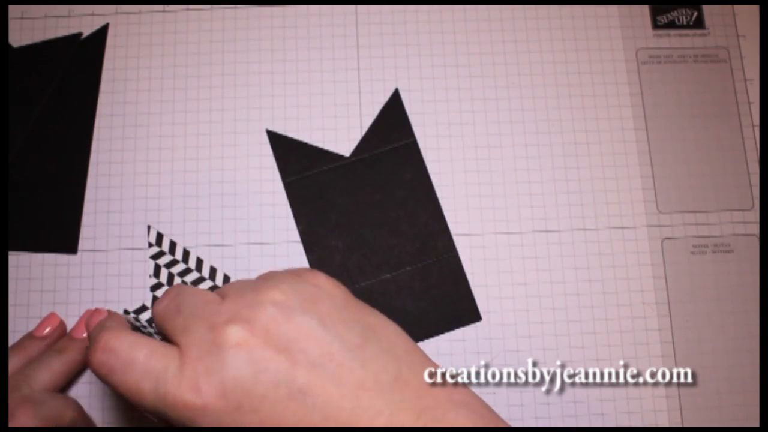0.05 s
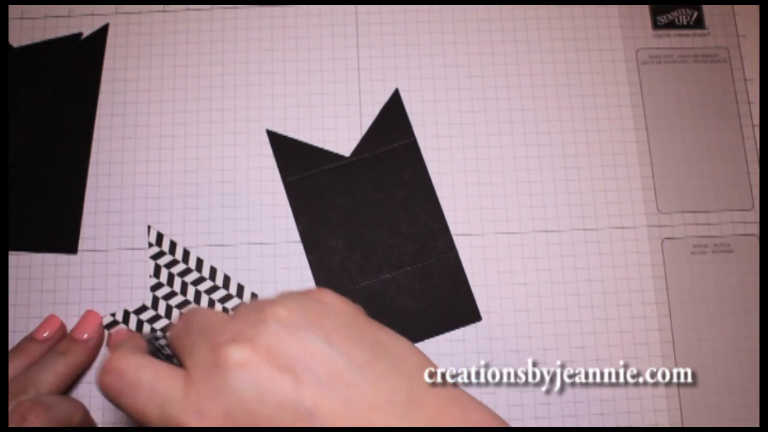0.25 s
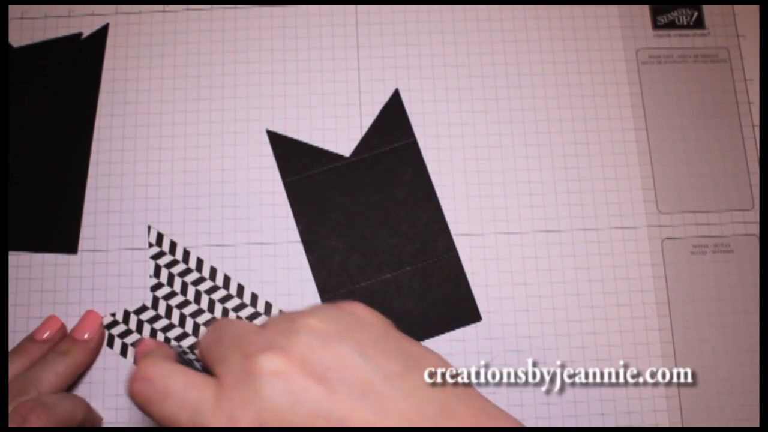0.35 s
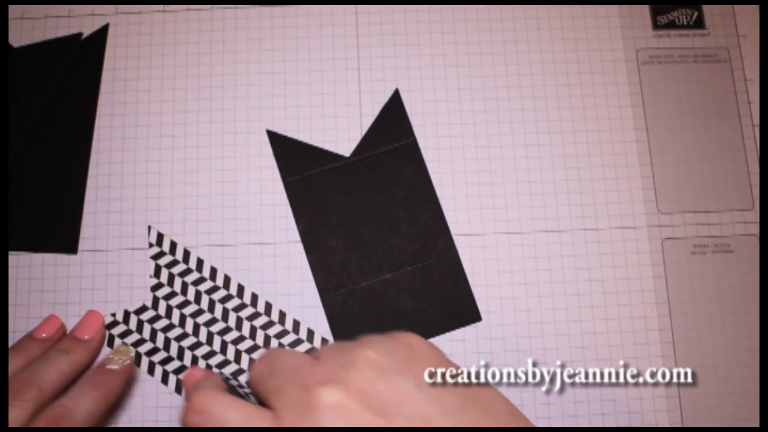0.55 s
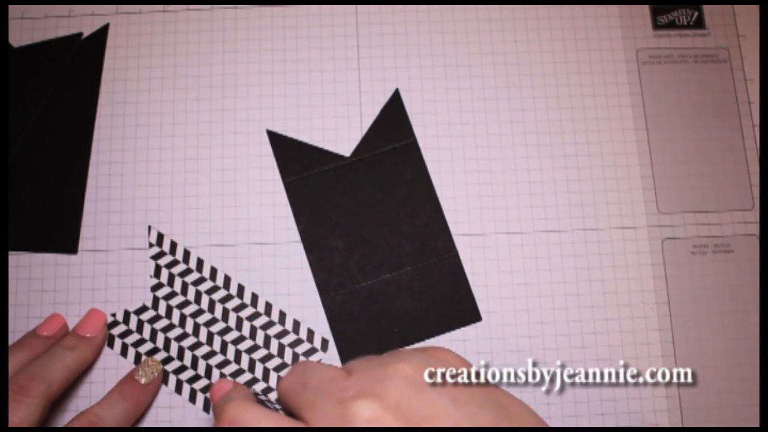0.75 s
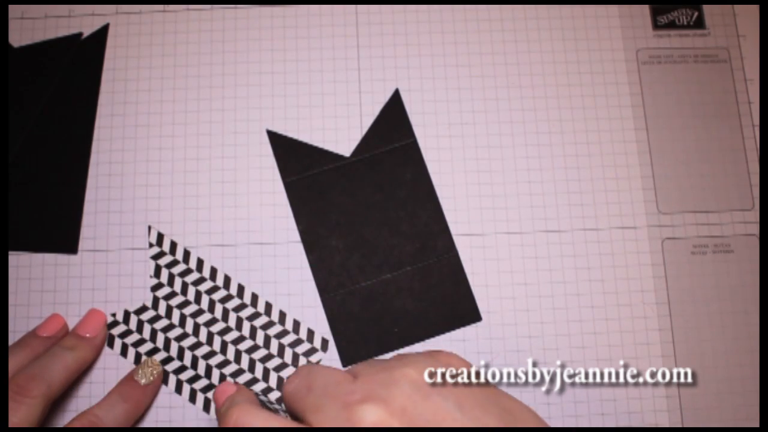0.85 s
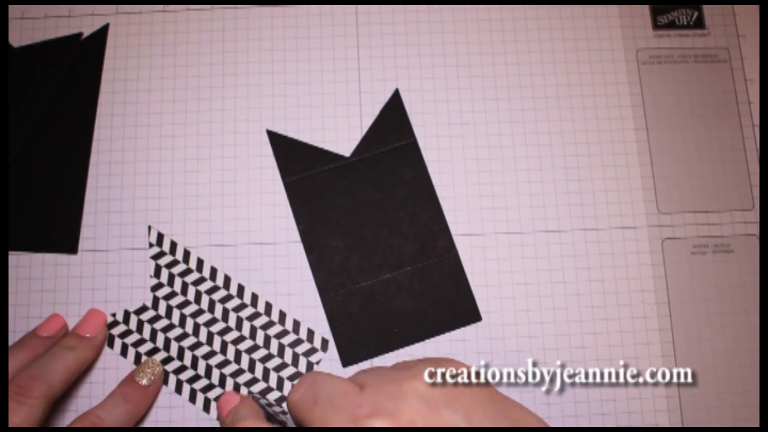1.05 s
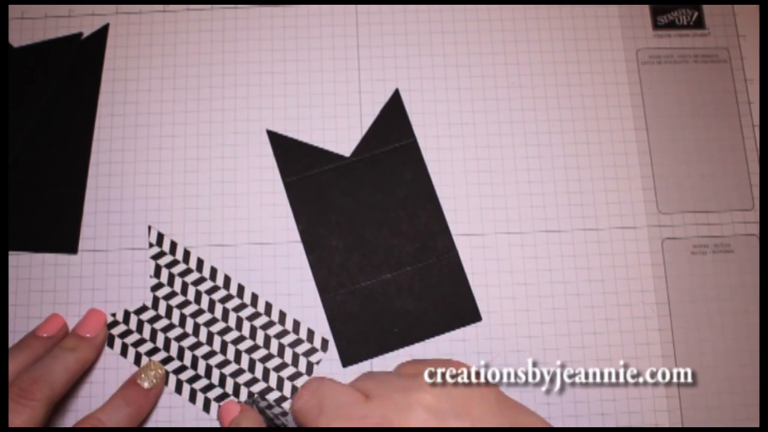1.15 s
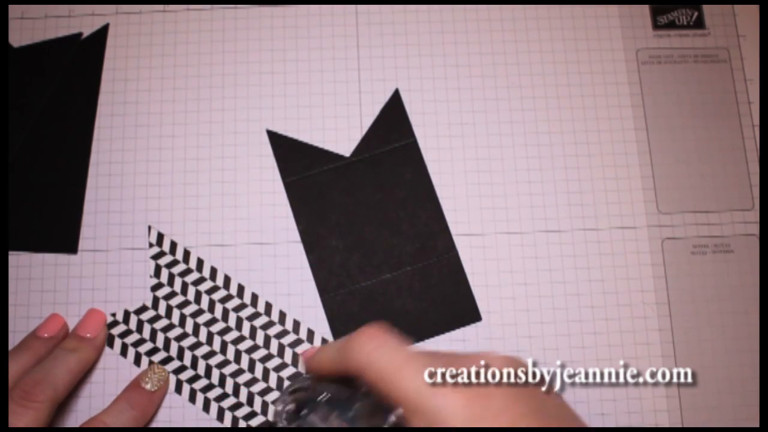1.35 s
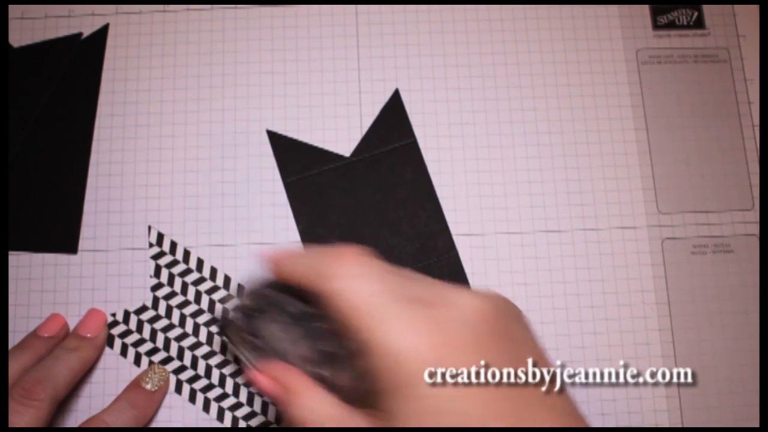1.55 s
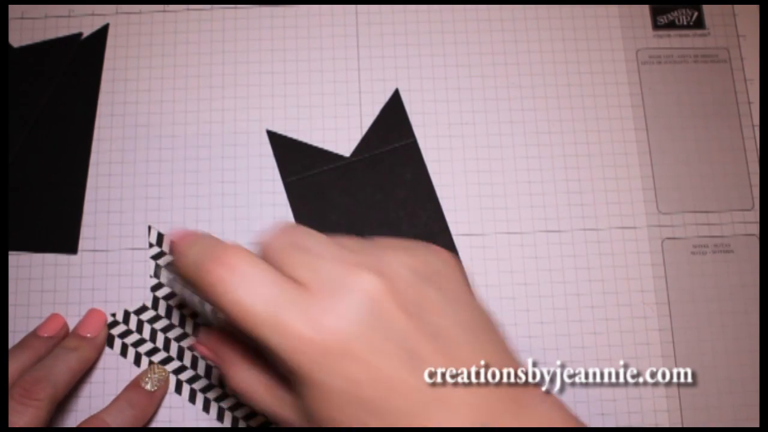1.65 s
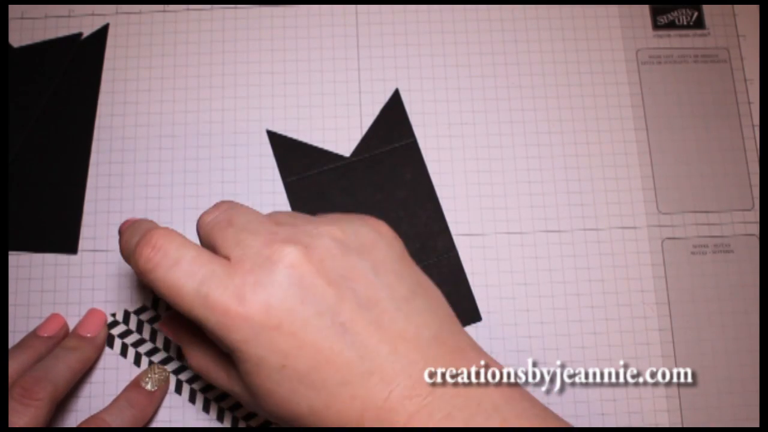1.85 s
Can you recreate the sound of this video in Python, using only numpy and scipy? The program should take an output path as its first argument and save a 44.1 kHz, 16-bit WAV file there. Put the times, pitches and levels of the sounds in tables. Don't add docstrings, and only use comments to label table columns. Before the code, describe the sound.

Tape runner dragged over paper: one bright, buzzing ratchet stroke, then scattered plastic snaps in a quiet room

```python
import sys
import numpy as np
from scipy import signal
from scipy.fft import rfft, irfft
from scipy.io import wavfile
from scipy.ndimage import uniform_filter1d

SR = 44100
rng = np.random.default_rng(int(sys.argv[2]) if len(sys.argv) > 2 else 0)


def transcribe(u):
    v = np.clip(np.atleast_2d(u).T, -1, 1)
    q = np.round(v * 32767).astype(np.int16)
    wavfile.write(sys.argv[1], SR, q)


def boost_factor(decibels):
    exponent = np.asarray(decibels, float) / 20
    return 10 ** exponent


N = 83790

# [f/Hz, density/dB]
ROOM_TONE = [(18, -41), (30, -40.5), (109, 1), (149, -12), (584, -14), (844, -18), (1250, -17),
             (1390, -20.5), (16000, -34.5)]
# [f/Hz, width/Hz, level/dB]
FINGERS = [
    (50, 67, -14),
    (310, 430, 3),
    (3000, 6300, -8.5),
]
# [f/Hz, width/Hz, level/dB]
HUM_BANDS = [(91.8, 2.7, -77), (119.8, 6.7, -60.5), (241.5, 31, -80), (48.6, 28, -78)]
# [t/s, glue dots passed]
TAPE_TRAVEL = [(.239, 0), (.30, 22), (.36, 42), (.40, 57), (.44, 70), (.462, 75), (.50, 89), (.56, 110),
               (.575, 115), (.602, 121), (.627, 126), (.661, 131), (.670, 132), (.697, 136), (.720, 140),
               (.746, 145), (.766, 149), (.786, 152)]
# [t/s, level/dB]
ROLLER_PRESSURE = [(.24, -21.5), (.29, -31.5), (.33, -28), (.37, -26), (.405, -21.5), (.435, -30.5),
                   (.46, -31), (.47, -35), (.53, -19.5), (.56, -27.5), (.60, -25.5), (.64, -38), (.70, -30),
                   (.745, -32), (.79, -20.5)]
LONE_DOT_TIMES = [.0283, .130, .138, .152, .918, .930, .9394, .9494, .9584, .9879, 1.0907, 1.1085, 1.1423,
                  1.249, 1.272, 1.2809, 1.3031]
# [level/dB, body/dB]
LONE_DOT_LEVELS = [(-26, -5), (-34, -5), (-33, -25), (-21.5, -11.5), (-8.5, -17), (-13, -17), (-17, -17),
                   (-18, -21), (-19.5, -13), (-17, -11), (-20, -14), (-19, -12), (-14, -10), (-38, -24.5),
                   (-18, -13.5), (-11.5, -10.5), (-10, -9.5)]
# [f/Hz, width/Hz, level/dB]
TAPE_BANDS = [(10720, 3000, -4.5), (12220, 2300, 6.5), (13420, 2280, 9.5), (14770, 1500, 5)]
# [f/Hz, width/Hz, level/dB]
CRACK_BANDS = [(5200, 4300, -10.5), (7850, 10500, 8.5)]
# [t/s, level/dB, treble/dB, shell ring/dB, loudest part f/Hz]
GEAR_KNOCKS = [(.0292, -30.5, -19, -44, 3680), (.067, -25, -28, -10, 3000), (.094, -35, -35, -3, 1200),
               (.1158, -22, -23, -10, 2430), (.136, -20.5, -32, 3.5, 1680), (.1475, -26, -24, 6.5, 1770),
               (.174, -19.5, -34, -2.5, 1820), (.8975, -36, -16, 0.5, 2520), (.923, -9, -9.5, -27, 3070),
               (.9895, -12, -9.5, -16, 5100), (1.0925, -29.5, -4, -4, 1370),
               (1.1105, -20.5, -7.5, 0.5, 5200), (1.1455, -15, -20, -7, 2600),
               (1.304, -12, -4.5, -37, 2740)]
# [t/s, level/dB, treble/dB, shell ring/dB]
RATCHET_TEETH = [(0.2301, -8, -5.5, -4), (0.2497, -8, -17, -11), (0.2658, -11.5, -3, 6.5),
                 (0.283, -11, -5, -2), (0.2985, -10.5, -5, -12), (0.3153, -12.5, -4.5, 2),
                 (0.334, -13, -2, -6), (0.3531, -15.5, -30, 11), (0.3741, -16, -1, -2), (0.392, -18, -6, 3),
                 (0.4076, -19.5, 4.5, -9), (0.4252, -21, 5, -19), (0.446, -18, -2, -12),
                 (0.4698, -18, -6, -31), (0.4908, -17.5, -3, 7.5), (0.511, -12.5, -21, -31),
                 (0.529, -19, -47, 11), (0.5478, -11, -3, -12), (0.5687, -13.5, -1.5, -32),
                 (0.5948, -11.5, -9, -43), (0.628, -13.5, -3.5, 4), (0.6755, -12, -7, -6),
                 (0.7217, -8.5, -10.5, -5.5), (0.75, -11, -6.5, -53), (0.7829, -11, -29, -49)]
# [f/Hz, level/dB]
SHELL_MODES = [(1180, -9), (1380, -16.5), (2050, -2.5), (2400, -4.5), (2980, 3.5), (3550, 5.5), (4240, 3),
               (4700, 2.5), (5210, 4.5), (6200, -5), (7300, -17), (8300, -56)]
# [f/Hz, level/dB]
RING_MODES = [(1670, -4), (1770, 0)]
# [f/Hz, width/Hz, t60/s, level/dB]
ROOM_TAIL = [(1346, 1700, 0.3, -11.5), (2600, 1380, 0.28, -12), (4910, 3220, 0.39, -14.5),
             (8270, 2400, .25, -12.5), (12000, 5800, 0.3, -20)]
# [f/Hz, level/dB]
THUD_MODES = [(1140, -3.5), (1370, 2.5)]
SHELL_T60_S = .008


def band(x, hz, width):
    edges = [max(hz - width / 2, 10), min(hz + width / 2, SR / 2.2)]
    return signal.sosfilt(signal.butter(2, edges, "band", fs=SR, output="sos"), x)


def bands(x, rows):
    return sum(boost_factor(db) * band(x, hz, width) for hz, width, db in rows)


def unit(x):
    return x / np.sqrt(np.mean(x ** 2))


def ring(x, modes, t60, colour_db=0):
    out = 0
    for (hz, db), extra_db in zip(modes, np.zeros(len(modes)) + colour_db):
        pole = np.exp(2j * np.pi * hz / SR - np.log(1000) / (t60 * SR))
        out = out + boost_factor(db + extra_db) * signal.lfilter([1], [1, -pole], x).imag
    return out


def clicks(times, db):
    return np.bincount((np.asarray(times) * SR).astype(int), boost_factor(db), N)[:N]


def background():
    f = np.arange(N // 2 + 1) * SR / N + 1
    hz, db = np.array(ROOM_TONE).T
    spectrum = boost_factor(np.interp(np.log(f), np.log(hz), db))
    tone = irfft(rfft(rng.standard_normal(N)) * spectrum, N)
    tone = tone * boost_factor(-59) / np.std(band(tone, 8120, 15870))
    settling = boost_factor(-51.5 - 60 * np.arange(N) / SR / 4.2)
    fingers = settling * unit(bands(rng.standard_normal(N), FINGERS))
    hum = sum(boost_factor(db) * unit(band(rng.standard_normal(N), hz, width)) for hz, width, db in HUM_BANDS)
    return tone + fingers + hum


def tick(x):
    echo_s, echo_db = .0017, -4
    flutter_s, flutter_width_s, flutter_db = .0021, .001, -19
    tail_db, tail_t60_s = -28, .043
    t = np.arange(1024) / SR
    env = boost_factor(flutter_db) * np.exp(-((t - flutter_s) / flutter_width_s) ** 2)
    env = env + boost_factor(tail_db - 60 * t / tail_t60_s)
    power = np.abs(signal.fftconvolve(x ** 2, env ** 2)[:N])
    flutter = np.sqrt(power) * rng.standard_normal(N)
    return x + boost_factor(echo_db) * np.roll(x, int(echo_s * SR)) + flutter


def peel():
    jitter, scatter_db = .06, 1.5
    dot_db, dot_crack_db, dot_body_db = 12.5, -11.5, -38
    lone_db, lone_crack_db = 3.5, 7.5
    at, dots = np.array(TAPE_TRAVEL).T
    n = np.arange(dots[-1] + 1)
    uneven = rng.standard_normal((len(n), 2))
    times = np.interp(n + jitter * uneven[:, 0], dots, at)
    pressure_db = np.interp(times, *np.array(ROLLER_PRESSURE).T)
    stroke = clicks(times, dot_db + pressure_db + scatter_db * uneven[:, 1])

    db, body_db = np.array(LONE_DOT_LEVELS).T
    lone = clicks(LONE_DOT_TIMES, db + lone_db)
    lone_crack = clicks(LONE_DOT_TIMES, db + body_db + lone_crack_db)
    tape = bands(tick(stroke + lone), TAPE_BANDS)
    crack = bands(tick(boost_factor(dot_crack_db) * stroke + lone_crack), CRACK_BANDS)
    crack = band(crack, 8000, 8600)
    shell = boost_factor(dot_body_db) * ring(tick(stroke), SHELL_MODES, SHELL_T60_S)
    roller = boost_factor(-1) * band(stroke, 373, 35)
    return tape + crack + shell, roller


def peak(v):
    return v / np.sqrt(np.max(uniform_filter1d(v ** 2, size=160)))


def pawl(rows, hold_s):
    attack_s, release_s = .0011, .0023
    impacts_per_s, grit_db, colour_db = 7000, 2.5, 2.0
    grip_db = 17.5
    shell_db, long_ring_db, tape_db, ring_t60_s = -9.5, -15, -6, .02
    out, t = np.zeros(N), np.arange(2048) / SR
    env = np.clip(t / attack_s, 0, 1) * np.exp(-np.maximum(t - hold_s, 0) / release_s)
    early = (t > attack_s / 2) * np.exp(-np.maximum(t - hold_s / 2, 0) / release_s)
    shell_hz = np.array(SHELL_MODES)[:, 0]
    for s, db, treble_db, ring_db, *struck_hz in rows:
        chance, (sign, grit) = rng.random(2048), rng.standard_normal((2, 2048))
        hits = (chance < impacts_per_s / SR) * np.sign(sign) * boost_factor(grit_db * grit)
        ring_colour = colour_db * rng.standard_normal(len(RING_MODES))
        shell_colour = colour_db * rng.standard_normal(len(SHELL_MODES))
        if struck_hz:
            octaves = np.abs(np.log2(shell_hz / struck_hz[0]))
            shell_colour = shell_colour - grip_db * np.minimum(octaves, 1)
        shell = peak(ring(env * hits, SHELL_MODES, SHELL_T60_S, shell_colour))
        ringing = peak(ring(env * hits, RING_MODES, ring_t60_s, ring_colour))
        treble = peak(bands(early * hits, TAPE_BANDS))
        knock = boost_factor(shell_db) * shell + boost_factor(long_ring_db + ring_db) * ringing
        knock = knock + boost_factor(tape_db + treble_db) * treble
        i = int((s - attack_s) * SR)
        out[i:i + 2048] += boost_factor(db) * knock
    return out


def room(x):
    t = np.arange(SR // 2) / SR
    tail = 0
    for hz, width, t60, db in ROOM_TAIL:
        tail = tail + boost_factor(db - 26.5 - 60 * t / t60) * band(rng.standard_normal(len(t)), hz, width)
    build_up = np.clip(t / 0.012, 0, 1)
    return signal.fftconvolve(x, tail * build_up)[:N]


def thud():
    start_s, hold_s, t60_s = 1.304, .006, .025
    t = np.arange(N) / SR - start_s
    shake = (t > 0) * (t < hold_s) * rng.standard_normal(N)
    v = band(ring(shake, THUD_MODES, t60_s), 1300, 1000)
    return boost_factor(-22) * v / np.abs(v).max()


def scene():
    dots, roller = peel()
    near = pawl(RATCHET_TEETH, hold_s=.0047) + pawl(GEAR_KNOCKS, hold_s=.0046) + dots
    small = signal.butter(8, 1058, "high", fs=SR, output="sos")
    near = signal.sosfilt(small, near + room(near))
    low = thud()
    return (near + low + room(low) + roller + background())[None]


def roll_off(x):
    return signal.sosfilt(signal.butter(12, 17010, fs=SR, output="sos"), x)


def record(dry):
    top_cut = signal.ellip(6, .5, 28, 15750, fs=SR, output="sos")
    mix = signal.sosfilt(top_cut, dry)
    return roll_off(mix)


dry = scene()
out = record(dry)
transcribe(out)
```